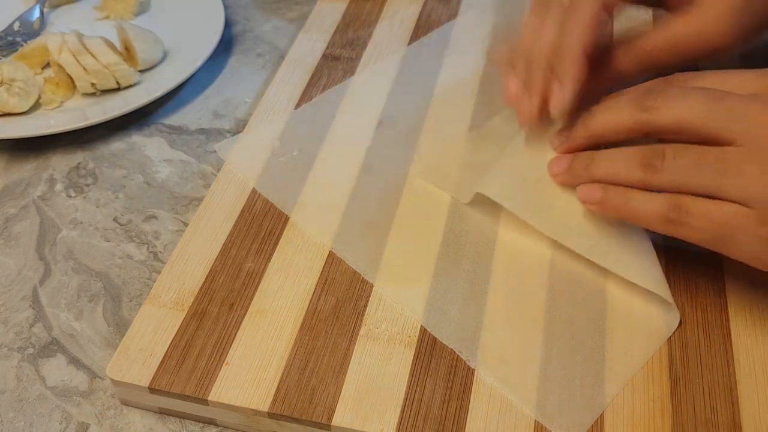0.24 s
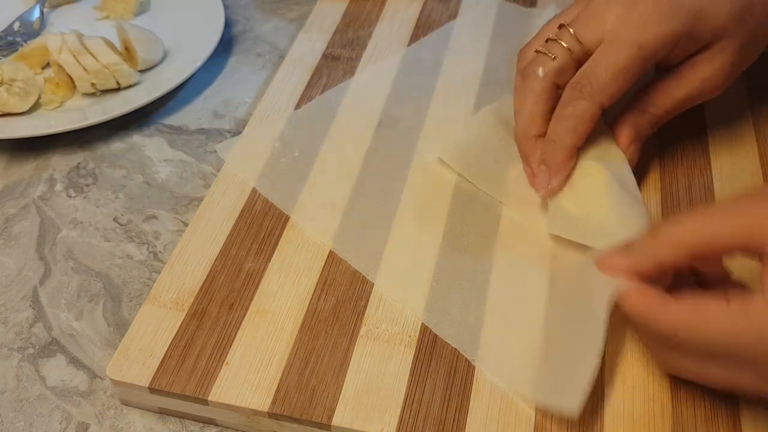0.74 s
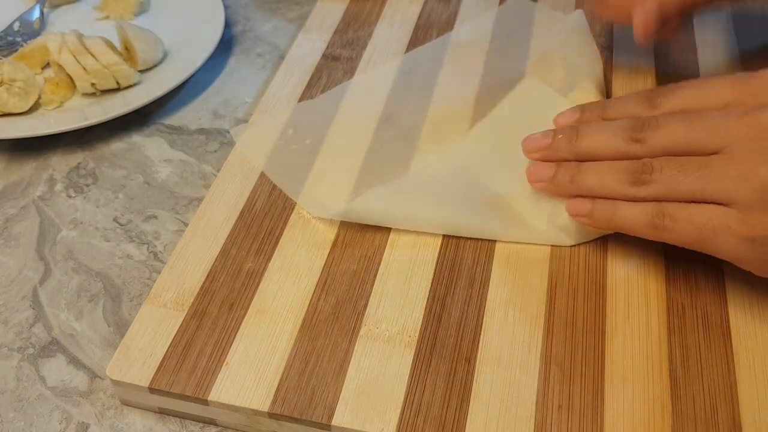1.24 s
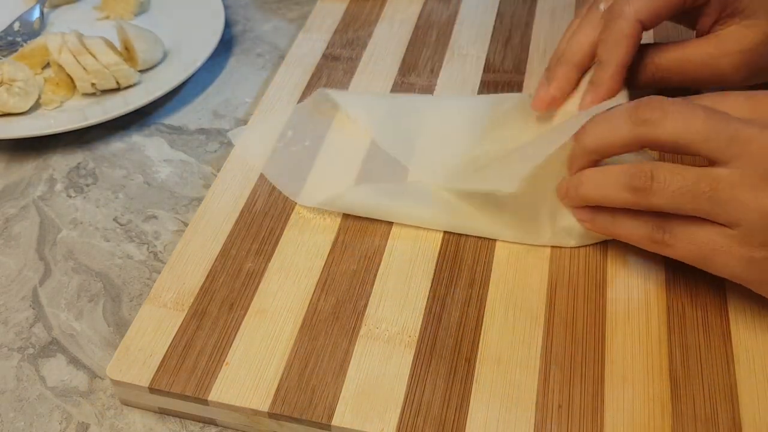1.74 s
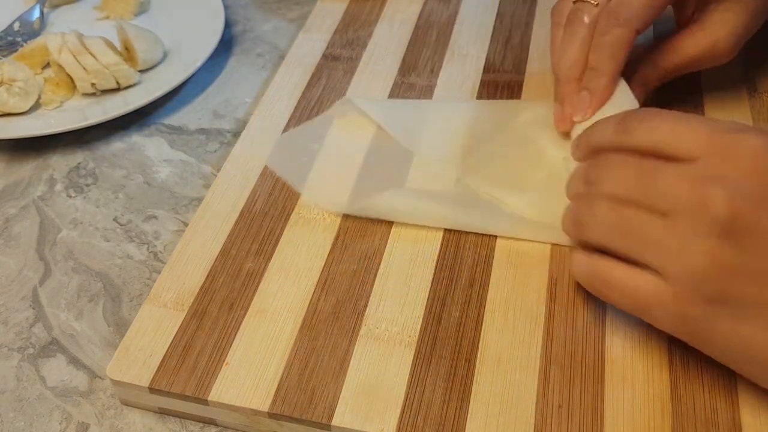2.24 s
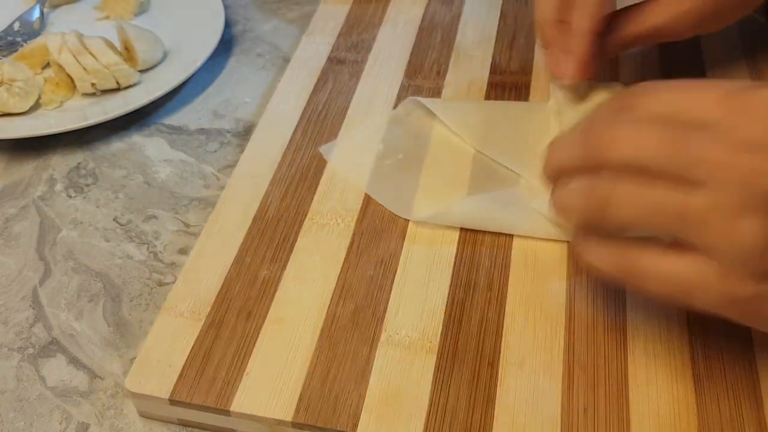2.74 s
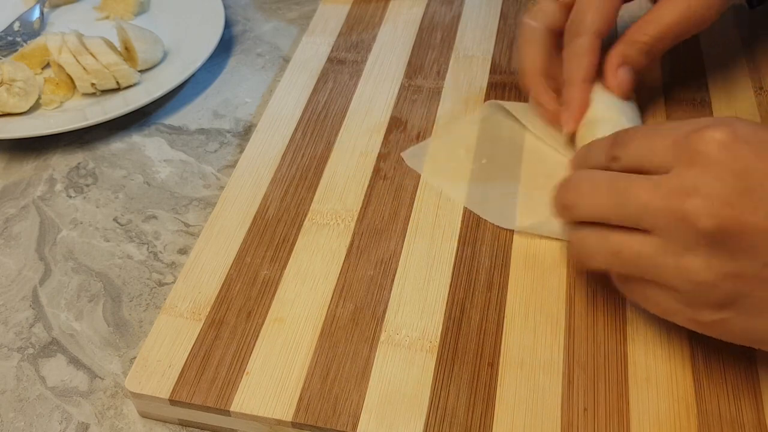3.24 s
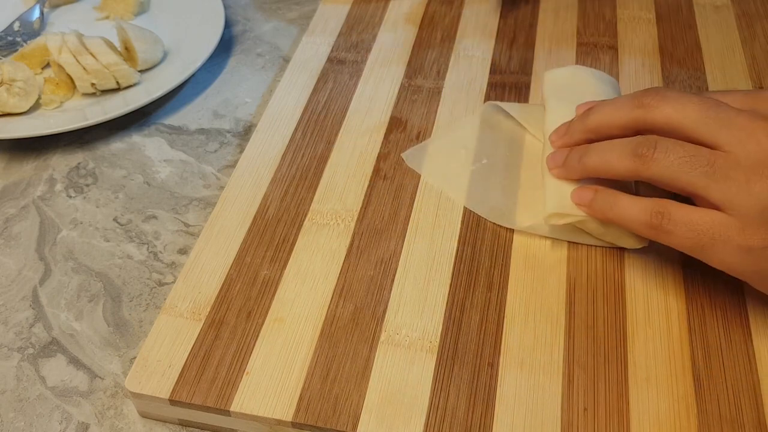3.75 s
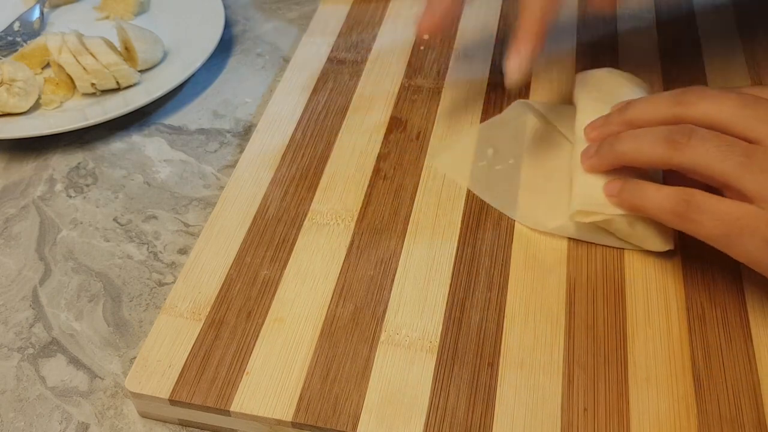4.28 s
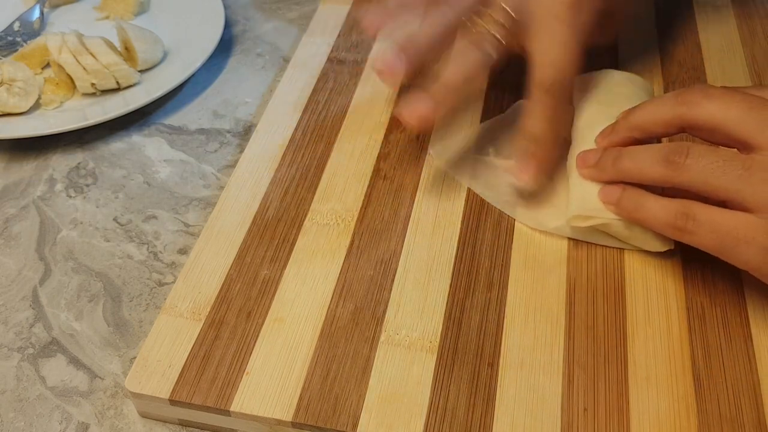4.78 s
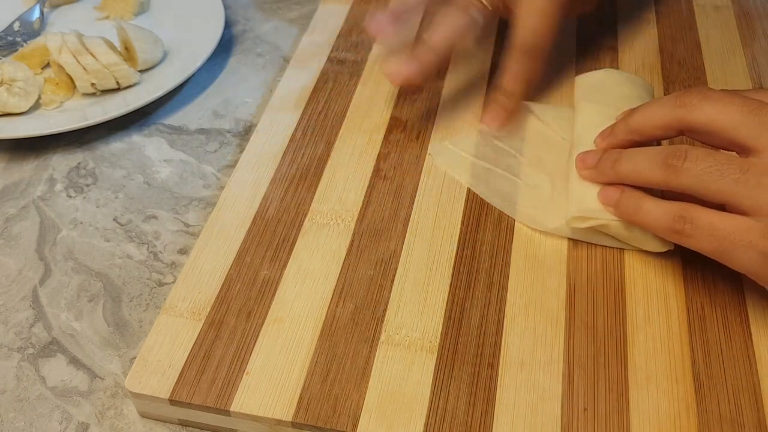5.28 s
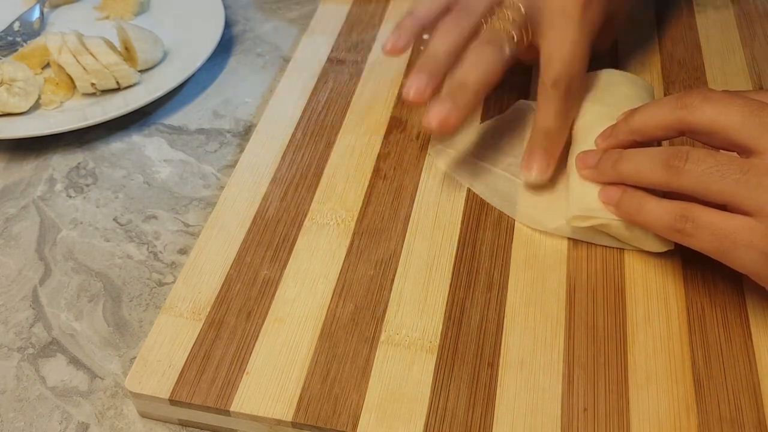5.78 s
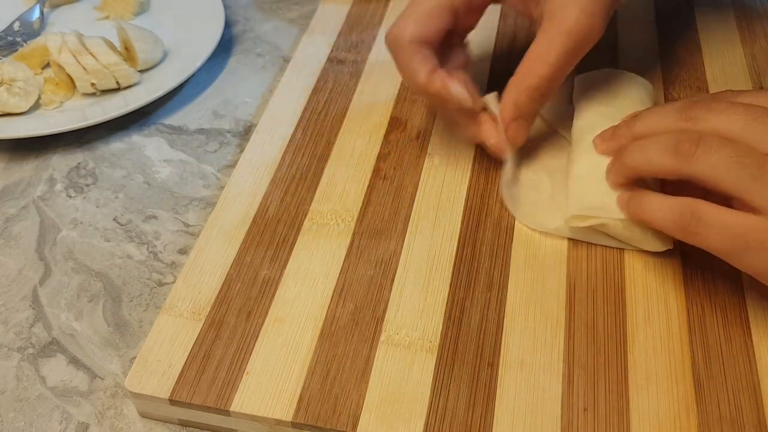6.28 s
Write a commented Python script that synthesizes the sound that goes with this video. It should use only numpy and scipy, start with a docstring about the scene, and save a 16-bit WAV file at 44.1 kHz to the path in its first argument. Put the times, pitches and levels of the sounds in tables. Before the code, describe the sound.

Hands fold a thin pastry sheet on a wooden board, with soft rustles, rubs and small fingernail ticks over a low hum.

```python
"""A quiet kitchen, where hands fold a thin pastry sheet on a wooden board near two microphones.
Fingers brush the sheet and drag it in short strokes: many tiny slips that blend into a rustle.
Nails and a ring tick on the board, one tap with a very bright click. Firm rubs chatter,
the counter thuds and a dish clinks once. Behind it all are a low rumble, a faint hiss and
a steady hum at twice the mains rate, which dips briefly at splices, as in sped-up audio."""
import sys
import numpy as np
from scipy import signal
from scipy.fft import rfft, irfft
from scipy.io import wavfile
from scipy.ndimage import uniform_filter1d

SR = 44100
rng = np.random.default_rng(int(sys.argv[2]) if len(sys.argv) > 2 else 0)


def to_wav(sig):
    """Store sig (one row per channel, or 1-D mono) as 16-bit WAV at the path in sys.argv[1].

    Samples outside -1..1 are clipped; the rate is SR.
    """
    pcm = np.clip(np.atleast_2d(sig), -1, 1) * 32767
    pcm = np.round(pcm).astype(np.int16)
    wavfile.write(sys.argv[1], SR, pcm.T)  # frames by channels


N = 287518

# the background, louder from the second fold on: t/s, hum level/dB, rumble level/dB
BACKGROUND = [(0.0, -50.5, -58.5), (.35, -50, -63), (.6, -50, -61), (1.15, -50.5, -65), (1.3, -48.5, -61.5),
              (1.6, -45, -55.5), (1.85, -45.5, -59.5), (2.7, -44.5, -58), (3.6, -45.5, -59.5),
              (4.25, -45.5, -58), (4.65, -45.5, -59), (4.9, -45, -59.5), (5.5, -45.5, -58.5),
              (6.0, -45, -59), (6.25, -45.5, -58), (6.52, -46, -59)]


def undb(db):
    """Turn decibels into a factor to multiply a sound by."""
    return 10 ** (np.asarray(db) / 20)


def unit(x):
    """Scale a sound to an average power of 1."""
    return x / np.sqrt(np.mean(x ** 2))


def pan(db, pan_db):
    """Left and right gains around a level; pan_db is left minus right."""
    return undb(db + pan_db * np.array([[.5], [-.5]]))


def curve(rows, column):
    """Join one column's levels with straight lines over time."""
    rows = np.asarray(rows)
    return np.interp(np.arange(N) / SR, rows[:, 0], rows[:, column], left=-130, right=-130)


def along(points, hz):
    """Read between (frequency, value) points, with every octave equally wide."""
    points = np.asarray(points)
    return np.interp(np.log(hz), np.log(points[:, 0]), points[:, 1])


def wander(rate):
    """Drift smoothly to a new random value, rate times a second."""
    hold = int(SR / rate)
    steps = np.repeat(rng.standard_normal(N // hold + 1), hold)
    return uniform_filter1d(uniform_filter1d(steps, hold), hold)[:N]


def stereo(noises, colour, resonances=()):
    """Give two unrelated noises a tone colour and share them between the microphones."""
    # how alike the microphones sound: f/Hz, likeness (limited to 0-1 below)
    likeness = [(40, 1.3), (100, 0.04), (160, 0.53), (290, 0.53), (640, -0.11), (1400, .0), (15000, .0)]
    # which side is louder: f/Hz, left minus right/dB
    balance = [(60, 4.5), (150, 1), (330, -2.5), (650, 4), (1300, -2.5), (2400, 1.5), (4200, -3), (8100, 1),
               (15000, 1.5)]
    hz = np.arange(N // 2 + 1) * SR / N + 1
    peaks_db = sum(gain / (1 + (2 * (hz - note) / width) ** 2) for note, width, gain in resonances)
    db = along(colour, hz) + peaks_db
    alike = np.clip(along(likeness, hz), 0, 1)
    mid = rfft(noises[0]) * np.sqrt(1 + alike)
    side = rfft(noises[1]) * np.sqrt(1 - alike)
    lean_db = along(balance, hz) / 2
    left = (mid + side) * undb(db + lean_db)
    right = (mid - side) * undb(db - lean_db)
    return unit(irfft(np.array([left, right]), N))


def slips(scatter_db, samples):
    """Two friction noises made of tiny slips, each a few samples long and of random strength."""
    noises = []
    for _ in range(2):
        strength = undb(scatter_db * rng.exponential(size=N // samples + 1))
        noises.append(np.repeat(strength, samples)[:N] * rng.standard_normal(N))
    return np.array(noises)


def ring(notes, length_s):
    """The fading notes of a struck object; each microphone hears its own random mix."""
    t = np.arange(int(length_s * SR)) / SR
    strengths = undb(2.5 * rng.standard_normal((2, len(notes))))
    # here and below, a fade time is how long a sound takes to fall by 60 dB
    tones = [undb(db - 60 * t / fade_s) * np.sin(2 * np.pi * hz * t) for hz, db, fade_s in notes]
    return strengths @ np.array(tones)


def add(out, start_s, sound):
    """Mix a sound into out at the given time."""
    i = int(start_s * SR)
    out[:, i:i + sound.shape[-1]] += sound[..., :N - i]


def hum():
    """A steady hum, briefly dipping at splices, where two pieces overlap and partly cancel."""
    # splices in the tone: t/s, jump/cycles
    splices = [(0.063, 0.32), (0.154, -0.2), (0.22, 0.25), (0.497, -0.43), (1.217, 0.45), (1.397, -0.34),
               (1.42, 0.2), (1.438, -0.3), (1.566, 0.35), (2.281, 0.27), (2.596, 0.31), (3.126, -0.45),
               (3.241, 0.32), (3.55, 0.2), (4.233, -0.38), (4.511, -0.49), (4.775, 0.27), (5.569, -0.27),
               (5.91, -0.16), (6.139, 0.21), (6.457, -0.3)]
    hum_hz, overlap_s = 99.6, 0.026
    t = np.arange(N) / SR
    shift = 2 * np.pi * sum(jump * (t > start_s) for start_s, jump in splices)
    cosine, sine = uniform_filter1d([np.cos(shift), np.sin(shift)], int(overlap_s * SR))
    phase = 2 * np.pi * hum_hz * t
    tone = np.sqrt(2) * (cosine * np.sin(phase) + sine * np.cos(phase))
    return tone * pan(curve(BACKGROUND, 1), pan_db=1.2)


def air():
    """The kitchen rumbles, with standing waves lifting a few notes, and the microphones hiss."""
    # colour of the rumble: f/Hz, relative level/dB
    rumble_colour = [(20, -38), (30, -10.5), (45, 1.5), (70, -2), (130, -0.5), (190, -15), (350, -13),
                     (600, -23.5), (900, -28.5), (2300, -35.5), (5000, -43.5), (9000, -60.5)]
    # standing waves between the walls: f/Hz, width/Hz, boost/dB
    room_notes = [(169.2, 13, 12), (224, 12, 7.5), (282.7, 15, 5), (337.2, 12, 8.5), (533.7, 9.4, 14)]
    # colour of the hiss: f/Hz, relative level/dB
    hiss_colour = [(1500, -15), (4000, -11), (6800, -10), (8300, -1.5), (11000, 0), (13000, 2),
                   (16000, -0.5)]
    rumble = stereo(rng.standard_normal((2, N)), rumble_colour, room_notes)
    hiss = stereo(rng.standard_normal((2, N)), hiss_colour)
    rumble_db = curve(BACKGROUND, 2) + 1.4 * wander(rate=8)
    hum_change_db = curve(BACKGROUND, 1) - BACKGROUND[-1][1]
    hiss_db = -73.5 + 0.64 * hum_change_db + .7 * wander(rate=12)  # rises and falls with the hum
    return rumble * undb(rumble_db) + hiss * undb(hiss_db)


def strokes():
    """How strong brushing, crackle, drag and rasp are over time as the hands make their strokes."""
    # hand strokes: t/s, length/s, level/dB, weight on the sheet/dB, swell from start to end/dB
    moves = [(0.151, 0.075, -77.5, -6, 6), (0.351, .09, -80.5, -3.5, -1), (0.49, 0.058, -78, -2.5, -6),
             (0.622, 0.12, -71.5, 0, 3), (0.717, 0.096, -74.5, -2.5, 3.5), (.82, 0.09, -83, -2.5, -3),
             (0.907, 0.072, -80, -3.5, 3), (1.038, 0.077, -77, -3, 0), (1.11, 0.051, -77.5, -4, 1),
             (1.204, 0.04, -77, -7, 7), (1.403, 0.15, -67.5, 1, 5), (1.554, 0.086, -67, -2.5, 1.5),
             (1.654, 0.057, -76.5, -6.5, 0), (1.744, 0.075, -76.5, -3.5, -1), (1.845, 0.18, -76, -3, -6),
             (2.139, 0.054, -75, 3, 8), (2.278, 0.085, -63.5, -1, 7.5), (2.367, 0.082, -59.5, -0.5, 7),
             (2.48, .1, -80.5, -4, -2), (2.599, 0.029, -55.5, -1, 6.5), (2.633, .075, -61, 8.5, 6),
             (2.718, 0.095, -72, 9.5, 5), (2.768, 0.033, -68, -2.5, -7), (2.81, 0.039, -81, 10, -9),
             (2.995, 0.051, -62.5, 5, 7.5), (3.042, .047, -63, 9, -1.5), (3.114, 0.017, -67.5, 9, 1),
             (3.124, 0.087, -57.5, -1, 2), (3.237, .038, -55.5, -1.5, 1), (3.31, .04, -80, 2, -1),
             (3.334, 0.046, -78, -8, 8), (4.229, 0.11, -80.5, -0.5, -5), (4.485, 0.055, -86, -11.5, 4),
             (4.76, 0.033, -88.5, -12.5, 4), (5.142, .035, -80, 3, -3), (5.188, 0.036, -86.5, -12, -1),
             (5.334, .03, -90, 8, 1), (5.374, .04, -87, -9.5, -2), (5.565, 0.036, -92, -13.5, -2),
             (5.696, 0.04, -83.5, 8.5, 1), (5.747, .05, -89, -11, 1), (5.91, 0.038, -74.5, 5, -7),
             (6.118, .06, -85, -3, -7), (6.205, 0.042, -78, -1, 1), (6.338, 0.026, -83, 5, -3),
             (6.46, 0.036, -90, -11, -5)]
    # weight trades brushing for drag; change per dB of weight: brush/dB, crackle/dB, drag/dB, rasp/dB
    per_weight = [-1.425, -0.082, 1.18, 1.74]
    rise_s, fade_s, arch_db = .018, 0.16, 2.5  # the arch lowers both ends of a stroke
    settle_db, settle_fade_s = -19.5, 1.34  # the sheet rustles on faintly afterwards
    power = np.zeros((4, N))
    t = np.arange(int(.6 * SR)) / SR
    rise = np.sin(np.pi / 2 * np.clip(t / rise_s, 0, 1)) ** 2
    for start_s, length_s, db, weight_db, swell_db in moves:
        from_middle = np.clip(t / length_s, 0, 1) - .5
        after_s = np.clip(t - length_s, 0, 1)
        hold = rise * undb(db + swell_db * from_middle - arch_db * (2 * from_middle) ** 2)
        fall = undb(-60 * after_s / fade_s)
        settle = undb(settle_db - 60 * after_s / settle_fade_s)
        shares = undb(weight_db * np.array(per_weight))
        add(power, start_s, np.outer(shares ** 2, hold ** 2 * (fall ** 2 + settle ** 2)))
    return np.sqrt(power)


def hands():
    """Fingertips brush the sheet, it crackles, and the folded pastry drags and rasps on the board."""
    # airy brushing of fingertips: f/Hz, relative level/dB
    brush_colour = [(3500, -25), (6500, -4.5), (8500, 2), (11500, -1), (16000, -6.5)]
    # crackle of the sheet: f/Hz, relative level/dB
    crackle_colour = [(2000, -22), (3000, -9), (3900, -4.5), (4800, -6), (6000, -6.5), (8000, -34)]
    # duller drag over the wood: f/Hz, relative level/dB
    drag_colour = [(400, -14), (750, -21), (1050, -9.5), (1350, -6.5), (1800, -5), (2500, -8),
                   (3000, -11.5), (4000, -24)]
    # low rasp of the board under weight: f/Hz, relative level/dB
    rasp_colour = [(200, -25), (330, -1.5), (520, 2.5), (800, 1.5), (1300, -8), (3000, -49)]
    # hollow notes of the rubbed board: f/Hz, width/Hz, boost or cut/dB
    board_notes = [(311, 58, 16.5), (464, 13, -7), (950, 17, 12.5), (1160, 25, 3), (1500, 17, -11),
                   (1760, 38, 0), (2520, 100, 2), (3050, 25, 6), (4300, 22, 6.5), (4900, 440, 3),
                   (8240, 32, 9)]
    brush = stereo(slips(1.5, samples=8), brush_colour, board_notes)
    crackle = stereo(slips(1.0, samples=16), crackle_colour, board_notes)
    drag = stereo(slips(1.5, samples=40), drag_colour, board_notes)
    rasp = stereo(slips(1.5, samples=80), rasp_colour)
    brushing, crackling, dragging, rasping = strokes()
    light = brush * brushing + crackle * crackling
    heavy = drag * dragging * undb(-0.5) + rasp * rasping * undb(-11.5)
    flicker = undb(0.76 * wander(rate=90))
    return (light + heavy) * flicker


def ticks():
    """A nail or a ring hits the board: a sharp crack, and the wood sounds briefly."""
    # taps on the board: t/s, level/dB, brightness/dB, left minus right/dB, favoured f/Hz
    taps = [(0.2266, -59, -2.5, 0, 1780), (0.5076, -68, -10, -2, 1950), (0.614, -55.5, -9.5, -9, 4020),
            (1.052, -73, -5, -0.5, 4240), (1.067, -61, -6, 0, 1670), (1.4139, -47, -7.5, -8, 4100),
            (1.422, -50.5, -21, -13, 1520), (2.1708, -52, -12, 0, 1520), (5.1429, -51.5, -6.5, 0, 2510),
            (5.9177, -51.5, -15, 2, 2300), (5.931, -54, -18, -6, 2140), (6.1338, -59, -17, -4, 3820),
            (6.4708, -55, -6.5, 0.5, 2380)]
    # notes of the struck board: f/Hz, level/dB, fade time/s
    board_notes = [(1350, -3, 0.014), (1546, -8.5, 0.027), (1750, -6, 0.02), (2224, -10, 0.052),
                   (2465, -7.5, 0.023), (2880, -5, 0.018), (3320, -11, 0.023), (3990, -1.5, 0.011),
                   (5200, -27, 0.011)]
    contact_s, wood_rise_s, wood_length_s = .0008, 0.00045, .1
    out = np.zeros((2, N))
    t = np.arange(int(0.021 * SR)) / SR
    contact = t / contact_s * np.exp(1 - t / contact_s)
    treble = signal.iirpeak(9200, Q=1.3, fs=SR)
    wood_rise = np.clip(np.arange(int(wood_length_s * SR)) / SR / wood_rise_s, 0, 1)
    for start_s, db, bright_db, pan_db, note_hz in taps:
        # the struck spot favours one note; others lose 11.4 dB for each octave away
        notes = [(hz, level - 11.4 * abs(np.log2(hz / note_hz)), fade_s)
                 for hz, level, fade_s in board_notes]
        sides = pan(db, pan_db)
        crack = contact * signal.lfilter(*treble, rng.standard_normal(len(t)))  # shared by both sides
        fizz = np.diff(rng.standard_normal((2, len(t) + 1))) * undb(-17 - 60 * t / 0.029)
        add(out, start_s, (crack + fizz) * sides * undb(bright_db + 6.5))
        add(out, start_s, ring(notes, wood_length_s) * wood_rise * sides * undb(-1.5))
    return out


def rubs_and_click():
    """Rubs chatter as slips ring one note; a very short, bright click tops the tap at 1.07 s."""
    # the rubs and the one click: t/s, length/s, f/Hz, width/Hz, level/dB, left minus right/dB
    bursts = [(0.646, 0.018, 3930, 350, -63.5, -11), (0.676, 0.033, 4050, 450, -71, -6),
              (0.64, 0.074, 1900, 1200, -75.5, -8), (1.065, .003, 14000, 4000, -58.5, 0),
              (1.44, 0.096, 1490, 900, -73, -2), (1.5, 0.016, 1270, 200, -66, -1),
              (1.576, 0.063, 1370, 796, -71, -8), (2.317, 0.055, 4100, 1500, -66, -7),
              (2.64, 0.055, 330, 80.5, -61.5, -5), (2.656, 0.039, 950, 600, -53.5, 0),
              (2.702, 0.079, 800, 600, -66.5, 3), (2.663, 0.03, 2300, 900, -58, -5),
              (3.003, 0.019, 343, 100, -57.5, 3), (3.004, 0.042, 4100, 900, -59, -13),
              (3.001, 0.028, 8260, 500, -66.5, -4), (3.008, 0.035, 1600, 700, -60.5, -5),
              (3.051, 0.034, 4300, 1500, -55.5, -3), (3.051, 0.044, 1360, 900, -57.5, -1),
              (3.05, 0.04, 427, 160, -59.5, 4), (3.242, 0.032, 4280, 1800, -61.5, 0),
              (3.249, 0.014, 8970, 500, -53.5, 4), (6.131, 0.012, 5300, 1300, -70.5, -3),
              (6.162, .02, 5000, 600, -80, -1), (6.224, .03, 950, 300, -77, -7),
              (6.345, 0.027, 950, 450, -79, 0)]
    rise_s, fade_s = 0.0053, 0.037
    out = np.zeros((2, N))
    noise = slips(2.5, samples=60)
    noise = noise + 0.38 * noise[::-1]  # each side hears some of the other
    for start_s, length_s, hz, width_hz, db, pan_db in bursts:
        t = np.arange(int((length_s + 0.14) * SR)) / SR
        i = int(start_s * SR)
        resonance = signal.iirpeak(hz, hz / width_hz, SR)
        note = signal.lfilter(*resonance, noise[:, i:i + len(t)])
        note = unit(signal.lfilter(*resonance, note))  # a second pass makes the note clearer
        rise = np.clip(t / rise_s, 0, 1)
        release = undb(-60 * np.clip(t - length_s, 0, 1) / fade_s)
        add(out, start_s, note * rise * release * pan(db, pan_db))
    return out


def thuds():
    """Soft pushes swing the counter, alike in both microphones."""
    # pushes on the counter: t/s, level/dB, f/Hz
    pushes = [(1.24, -53, 44.5), (1.414, -55, 264), (1.417, -49, 385), (1.434, -54.5, 493), (2.26, -52, 42),
              (2.48, -50, 42), (3.011, -43, 42.5), (3.866, -54, 145), (4.52, -42, 41.4), (4.969, -50, 41.7),
              (5.14, -44.5, 110.5), (5.928, -49, 44.5), (6.15, -41, 140), (6.163, -47, 41.3)]
    out = np.zeros((2, N))
    t = np.arange(int(.4 * SR)) / SR
    for start_s, db, hz in pushes:
        fade_s = 0.19 * (115.0 / hz) ** 0.75  # higher thuds die sooner
        rise = 1 - np.exp(-t * hz * 24.0)
        add(out, start_s, rise * undb(db - 60 * t / fade_s) * np.sin(2 * np.pi * hz * t))
    return out


def clink():
    """A dish further off rings briefly on two notes."""
    # a small knock on the dish: t/s, level/dB, f/Hz
    knocks = [(3.856, -69.5, 2250)]
    # notes of the dish: ratio to its pitch, level/dB, fade time/s
    dish_notes = [(1, 0, .05), (1.25, -1.5, .05)]
    out = np.zeros((2, N))
    for start_s, db, hz in knocks:
        notes = [(hz * ratio, level, fade_s) for ratio, level, fade_s in dish_notes]
        add(out, start_s, ring(notes, length_s=.15) * undb(db))
    return out


def wall_echo(sound):
    """Tiled walls answer with a short, dull scatter of echoes."""
    delay_s, fade_s, echo_db = .004, 0.15, -6
    t = np.arange(int(.3 * SR)) / SR
    dull_noise = uniform_filter1d(rng.standard_normal((2, len(t))), size=3)
    echoes = dull_noise * undb(-60 * t / fade_s) * (t > delay_s)
    echoes /= np.sqrt(np.sum(echoes ** 2) / 2)
    return undb(echo_db) * signal.fftconvolve(sound, echoes, axes=1)[:, :N]


def scene():
    """Add up the kitchen's sounds; only the crisp ones echo."""
    crisp = ticks() + clink() + rubs_and_click()
    return crisp + wall_echo(crisp) + hands() + thuds() + hum() + air()


def record(dry):
    """The camera cuts the deepest bass and the highest treble."""
    bottom_hz, top_hz = 32, 15850
    bass_cut = signal.butter(2, bottom_hz, "high", fs=SR, output="sos")
    treble_cut = signal.ellip(12, .2, 60, top_hz, fs=SR, output="sos")
    return signal.sosfilt(treble_cut, signal.sosfilt(bass_cut, dry))


dry = scene()
out = record(dry)
to_wav(out)
```